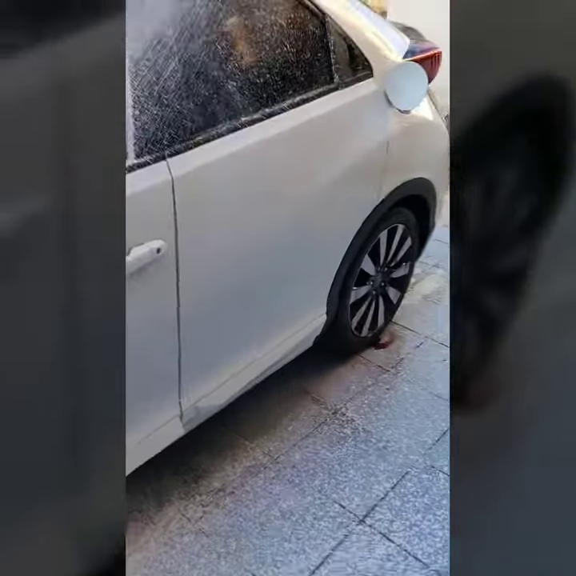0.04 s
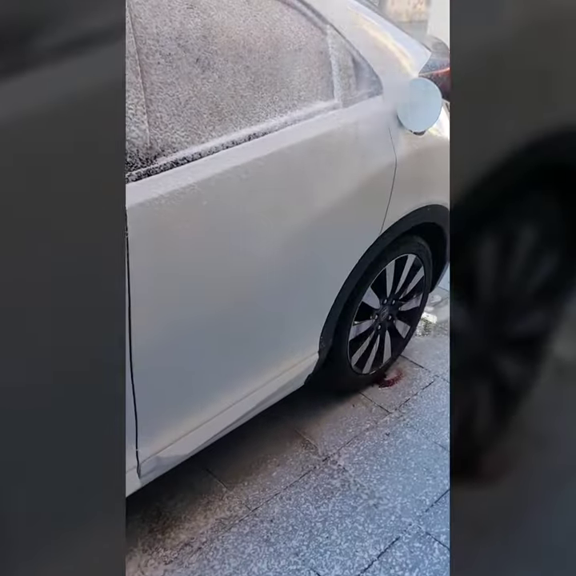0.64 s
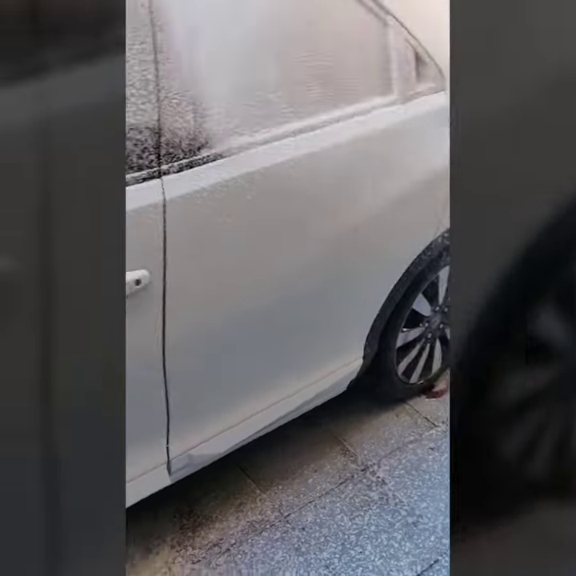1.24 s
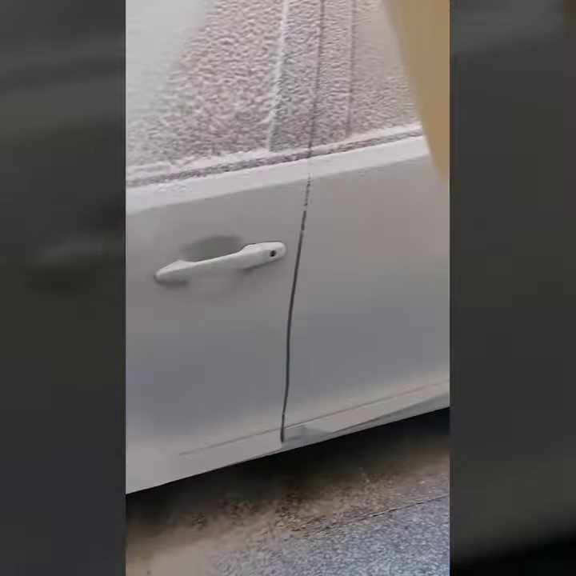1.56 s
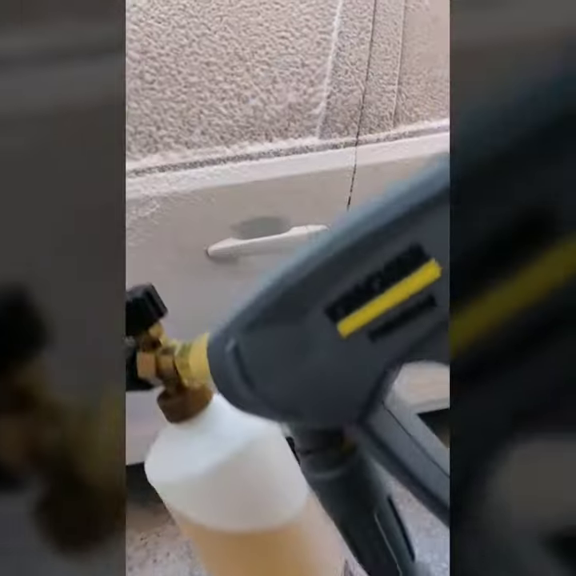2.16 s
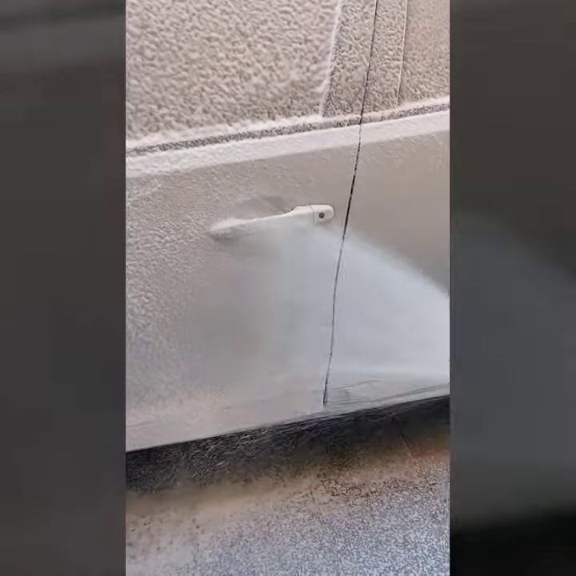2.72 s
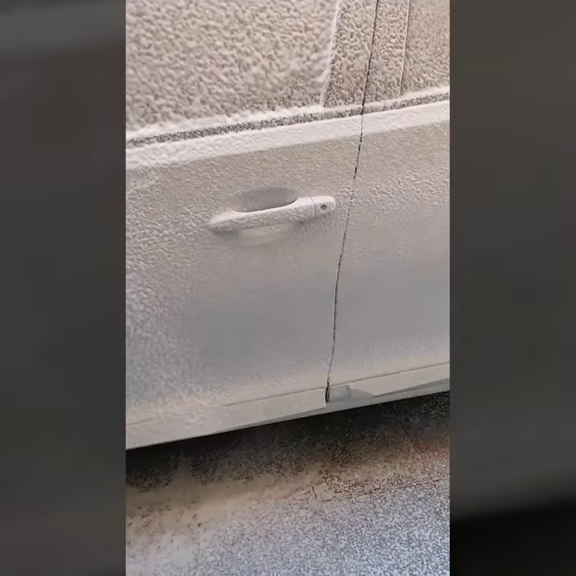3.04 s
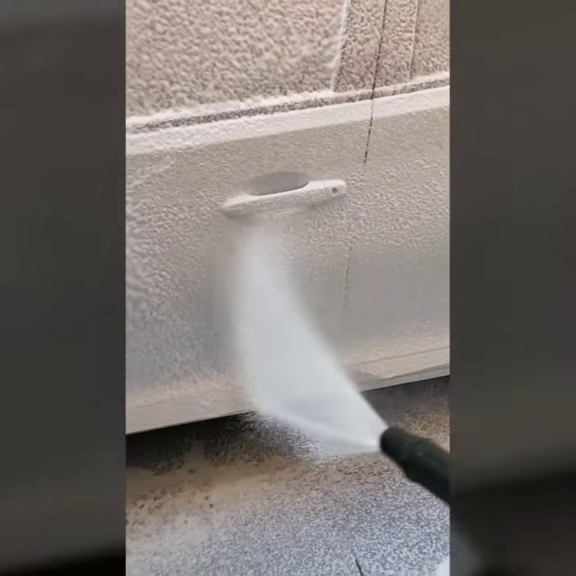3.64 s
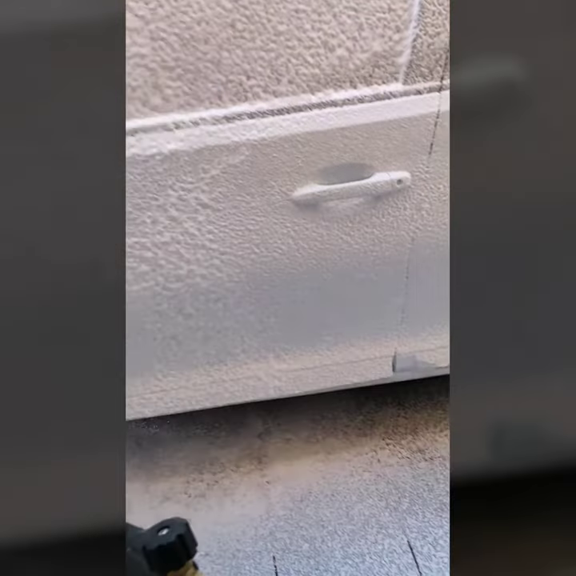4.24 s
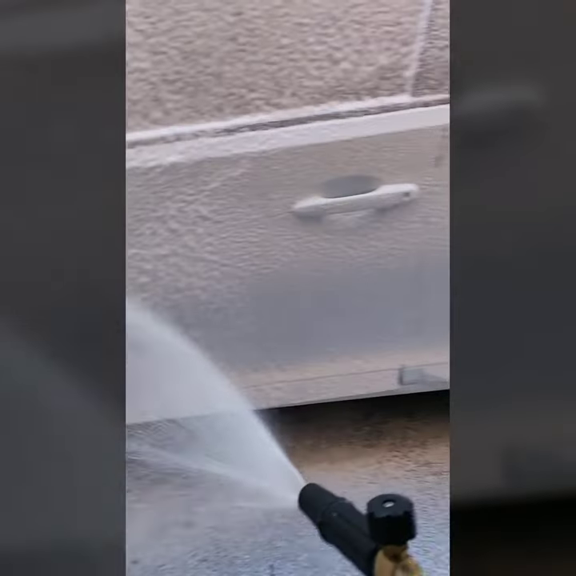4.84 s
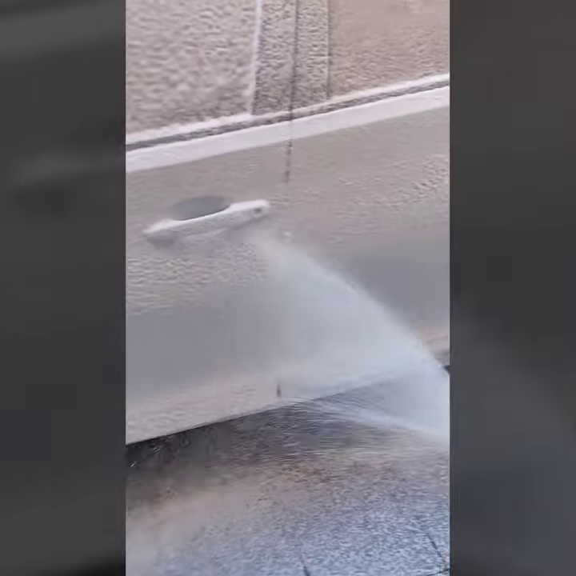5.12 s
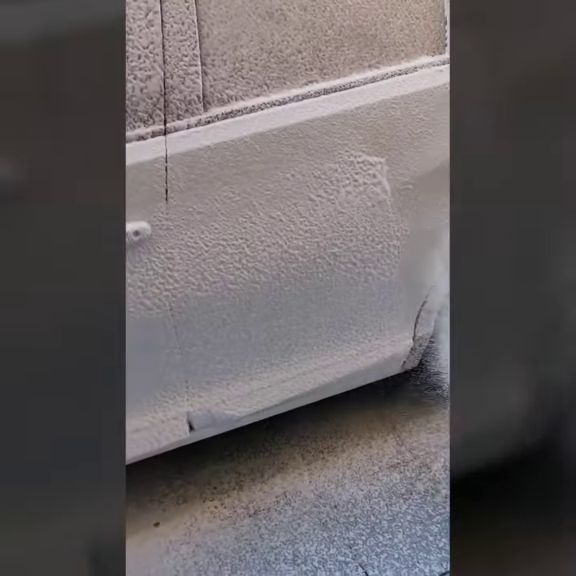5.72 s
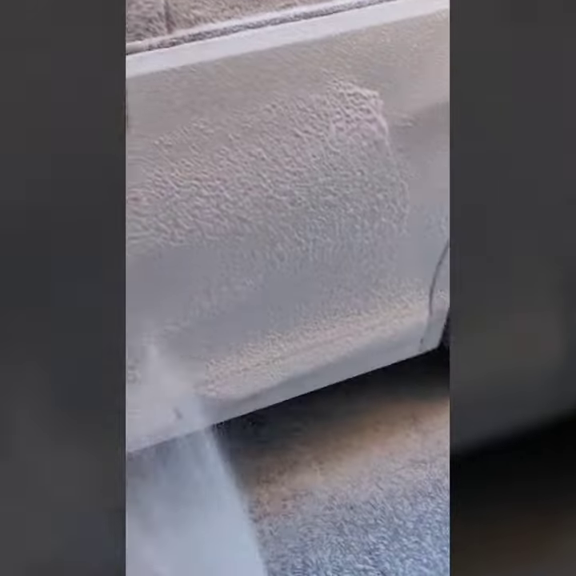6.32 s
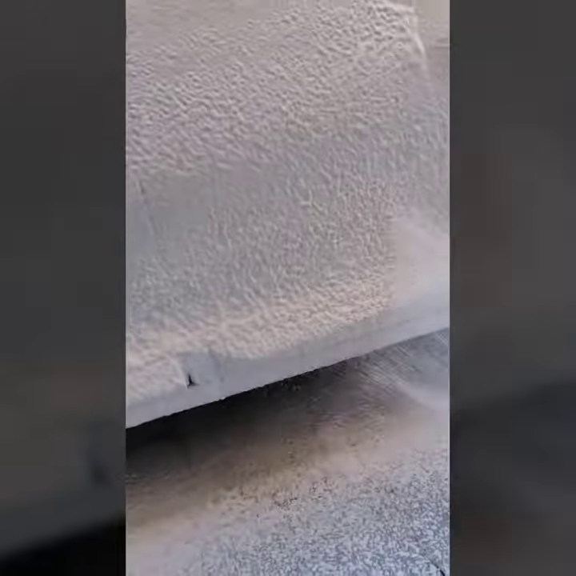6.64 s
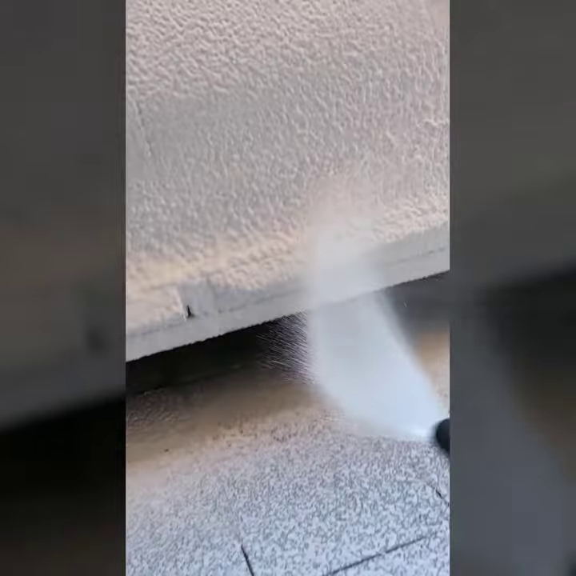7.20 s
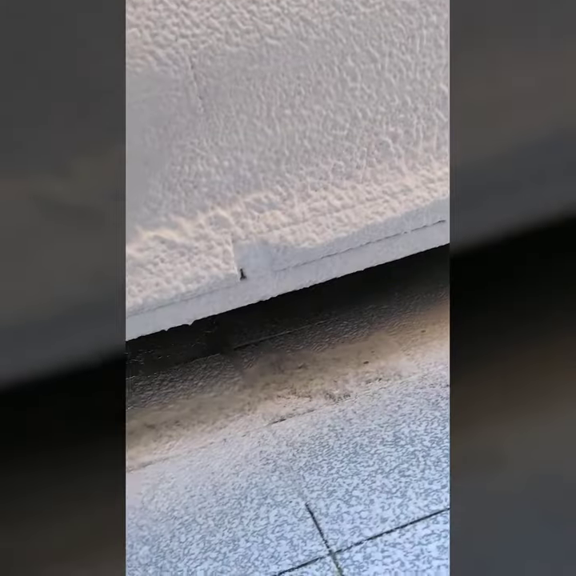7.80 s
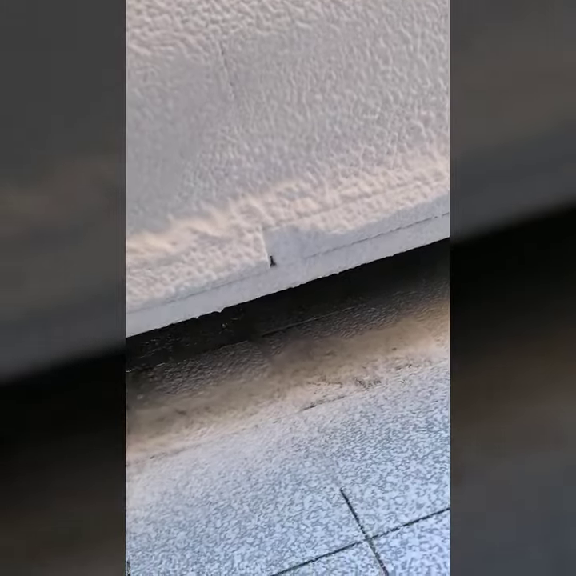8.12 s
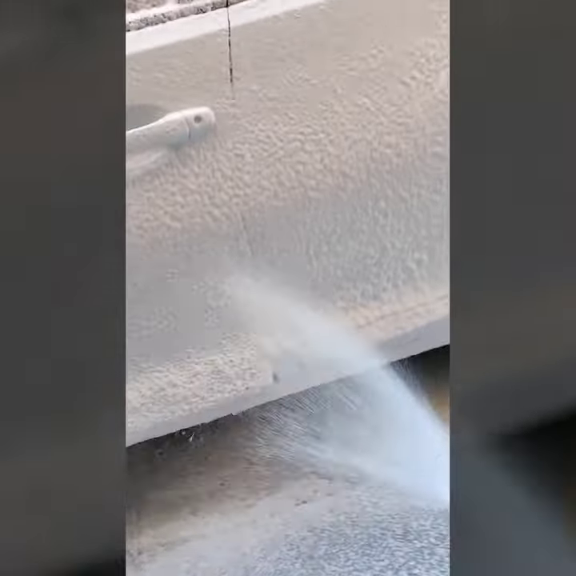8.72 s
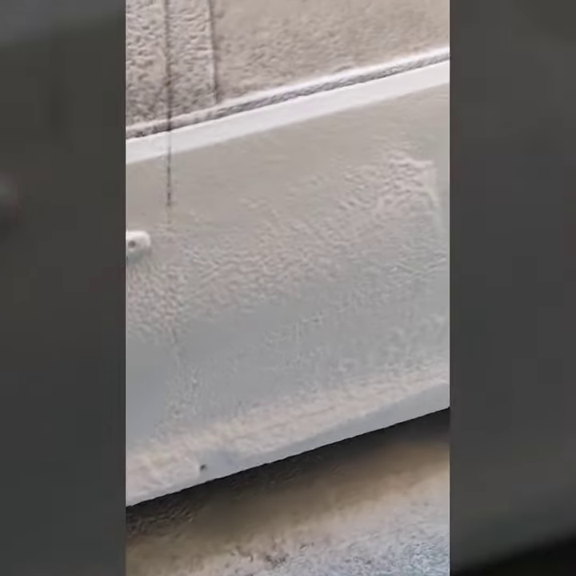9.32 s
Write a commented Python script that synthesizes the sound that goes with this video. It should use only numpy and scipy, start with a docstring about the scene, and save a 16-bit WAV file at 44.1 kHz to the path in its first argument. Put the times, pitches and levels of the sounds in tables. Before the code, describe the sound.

A pressure washer sprays foam onto a car outdoors, close to the microphone. A loud, bright hiss is there from the start and runs unbroken for about nine and a half seconds. It swells, dips and shifts gently from side to side as the nozzle sweeps, with a fine fizz of mist on top. Beneath it, foam drums softly and washes wetly over the hollow panels, and the pump hums faintly a little way off. From about 0.7 to 2.7 seconds the spray draws a thin ringing from the window and door, blended into the hiss. Around 8 seconds the nozzle comes closest to the door and a panel rings faintly, lower in pitch. Near 8.9 seconds a light puff of air brushes the microphone, followed by one more faint ring as the spraying continues.

```python
"""A pressure washer lays foam on a car outdoors, close to a hand-held microphone with two openings (ports).
From the start the sweeping nozzle hisses, with gliding echoes off paving and door; mist fizzes, foam
drums on the car, a three-piston pump hums a little way off and moving air rumbles faintly.
From about 0.7 to 2.7 s the spray makes window and door ring. Near 8 s the nozzle is closest to the door
and a panel rings again. Near 8.9 s a puff of air hits the microphone, and one last ring follows."""
import sys
import numpy as np
from scipy import signal
from scipy.fft import rfft, irfft, next_fast_len
from scipy.io import wavfile
from scipy.ndimage import uniform_filter1d, map_coordinates

SR = 44100
rng = np.random.default_rng(int(sys.argv[2]) if len(sys.argv) > 2 else 0)


def generate_wav(signal):
    """Clip the signal to [-1, 1] and save it as 16-bit WAV at the path in sys.argv[1]."""
    frames = np.transpose(np.atleast_2d(signal))
    scaled = np.clip(frames, -1, 1) * 32767
    pcm = np.round(scaled).astype(np.int16)
    wavfile.write(sys.argv[1], SR, pcm)


N = 421596


def amp(db):
    """Turn decibels into a number to multiply by."""
    return 10 ** (np.asarray(db) / 20)


def unit(x):
    """Scale a sound to an average strength (rms) of 1."""
    return x / np.sqrt(np.mean(x ** 2) + 1e-20)


def at_pitch(rows, hz):
    """Read between the rows of a (pitch_hz, value) table, on a log pitch scale."""
    pitches, values = np.transpose(rows)
    return np.interp(np.log(hz + 1), np.log(pitches + 1), values)


def curves(rows):
    """Turn each column after time_s into one value per sample."""
    times, *columns = np.transpose(rows)
    return [np.interp(np.arange(N) / SR, times, column) for column in columns]


def wobble(rate_hz):
    """A smooth curve through rate_hz random points a second."""
    points = rng.standard_normal(int(N * rate_hz / SR) + 4)
    return map_coordinates(points, [np.arange(N) * rate_hz / SR])


def filtered(x, response):
    """Multiply each pitch in x by response(hz)."""
    size = next_fast_len(N + SR // 4)
    return irfft(rfft(x, size) * response(np.fft.rfftfreq(size, 1 / SR)), size)[..., :N]


def delayed(x, ms):
    """Send x along a path whose travel time changes."""
    return map_coordinates(x, [np.arange(N) - ms * SR / 1000], mode="mirror")


def eddies(patchy_db, channels=2):
    """White noise whose strength wanders in patches of time and pitch."""
    spectrum = signal.stft(rng.standard_normal((channels, N)), nperseg=512)[2]
    patches = uniform_filter1d(rng.standard_normal(spectrum.shape), size=7, axis=1)
    patches = uniform_filter1d(patches, size=10, axis=2)
    return unit(signal.istft(spectrum * amp(patchy_db * unit(patches)), nperseg=512)[1][:, :N])


def rush(colour, alike, patchy_db):
    """Stereo noise shaped by a colour table; alike is the share common to both ports."""
    noise = eddies(patchy_db, channels=3)
    pair = np.sqrt(alike) * noise[0] + np.sqrt(1 - alike) * noise[1:]
    return unit(filtered(pair, lambda hz: amp(at_pitch(colour, hz))))


# The nozzle's direction, as how much later the left port hears it: time_s, lag_ms
LEFT_LAG = [(0, -.39), (.85, -.295), (1.4, -.33), (1.8, -.26), (2.25, 0), (2.47, .055), (3.1, -.025),
            (4.05, .07), (4.75, .16), (5.5, .055), (6.43, .25), (7.15, .005), (7.65, .165), (8.4, .23),
            (9.05, .04), (9.56, -.065)]
# How much later the two echoes arrive: time_s, paving_ms, door_ms
ECHO_DELAYS = [(0, 4.2, 2.8), (1.3, 3.5, 2.85), (2.1, 4.05, 2.8), (3.6, 4, 2.4), (5.6, 4.4, 2.6),
               (6.6, 3.65, 2.7), (7.2, 3.8, 2.15), (7.55, 3.5, 1.74), (7.9, 3.36, 1.61), (8.15, 3.38, 1.53),
               (8.6, 3.6, 1.75), (9.2, 4.3, 2.6), (9.56, 4.25, 2.8)]
def nozzle(paving_lag_ms=-0.052):
    """Nozzle noise arrives straight and bounces off paving and door; a nearer surface echoes louder."""
    source = eddies(patchy_db=1.22, channels=1)[0]
    (lag_ms,), (paving_ms, door_ms) = curves(LEFT_LAG), curves(ECHO_DELAYS)
    paving_gain = amp(-4.5 - 5 * (paving_ms - 3.42))  # 5 dB weaker per extra ms of travel
    door_gain = amp(-4.5 - 12 * (door_ms - 1.47))
    ports = []
    for side in (.5, -.5):  # left, right
        straight = delayed(source, side * lag_ms)
        off_paving = paving_gain * delayed(source, paving_ms + side * paving_lag_ms)
        off_door = door_gain * delayed(source, door_ms + 2 * side * lag_ms)
        ports.append(straight + off_paving + off_door)
    return np.array(ports) / np.sqrt(1 + paving_gain ** 2 + door_gain ** 2)


# The jet's colour (how strong each pitch is) at each port: pitch_hz, level_db
LEFT_COLOUR = [(400, -39), (1000, -26), (1600, -13.5), (2500, -5.5), (3100, 2.5), (4050, 2), (4700, -1),
               (5450, -1), (6050, -2), (6850, 3.5), (7600, -8), (8400, -11.5), (9200, -27), (12000, -47)]
RIGHT_COLOUR = [(400, -35), (1000, -29), (1600, -14), (2500, -4), (3100, 5.5), (4100, 6), (4750, -1.5),
                (5450, 3), (6050, -4.5), (6850, -2.5), (7600, 1.5), (8400, -7), (9500, -12.5), (12000, -25)]
# One narrow peak in the hiss: pitch_hz, width_hz, boost_db
HISS_PEAK = (2073, 316, 11.4)
# How far the wave at the left port runs ahead of the right: pitch_hz, lead_radians
LEFT_LEAD = [(1000, 0), (1600, -.45), (2500, -.3), (3500, .1), (4500, .25), (5700, 1), (6500, 0),
             (7300, -.85), (8000, 0)]
def port_colour(hz):
    """The two ports resonate differently, so each gives the hiss its own colour and timing."""
    centre_hz, width_hz, boost_db = HISS_PEAK
    peak_db = boost_db / (1 + (2 * (hz - centre_hz) / width_hz) ** 2)
    colour_db = np.array([at_pitch(LEFT_COLOUR, hz), at_pitch(RIGHT_COLOUR, hz)])
    phase = np.outer([.5, -.5], at_pitch(LEFT_LEAD, hz))
    return amp(colour_db + peak_db) * np.exp(1j * phase)


# How the noise is split before the fan's width is applied: pitch_hz, nozzle_power_share
NOZZLE_SHARE = [(1000, 0.39), (2100, 0.75), (3800, 0.61), (5000, 0.47), (6100, 0.48), (7100, 0.4),
                (8200, 0.18), (12000, 0.054)]
# How widely the fan of foam opens toward the microphone: time_s, fan_gain_db
FAN_SPREAD = [(0, -3), (.85, -3.5), (1.35, -2), (2.4, -4), (3.3, 0.5), (4.6, -4), (5.8, 2), (6.6, -0.5),
              (7.9, -3), (9.56, -1)]
def spray_noise():
    """The small nozzle and its wide fan of foam sound together, at about steady total power."""
    fan_gain = amp(curves(FAN_SPREAD)[0])
    point = filtered(nozzle(), lambda hz: np.sqrt(at_pitch(NOZZLE_SHARE, hz)))
    fan = filtered(eddies(patchy_db=2.03), lambda hz: np.sqrt(1 - at_pitch(NOZZLE_SHARE, hz)))
    blend = (point + fan_gain * fan) / np.sqrt((2 + fan_gain ** 2) / 3)
    return filtered(blend, port_colour)


# How the jet's strength rises and falls as the fan turns: time_s, hiss_db, sizzle_db
JET_STRENGTH = [(0.0, -16.5, -21), (0.42, -18.5, -21), (1.33, -13.8, -19.5), (1.63, -20.5, -23),
                (1.87, -15, -20.5), (2.73, -16.5, -19), (2.89, -21, -24.5), (3.41, -19.5, -20.5),
                (3.55, -16.0, -20.7), (4.66, -14.5, -22.5), (5.7, -18, -21.5), (6.04, -17.5, -22.5),
                (7.07, -17.5, -21), (7.19, -14.5, -19), (8.05, -16, -23.5), (8.58, -13, -20.2),
                (9.08, -15.5, -19), (9.56, -17.5, -22)]
def jet(roar_top_hz=2687, hiss_top_hz=6460, pan_db_per_ms=-6.5):
    """The spray makes a low roar, a hiss and a high sizzle, louder at the port facing the nozzle."""
    hiss_db, sizzle_db = curves(JET_STRENGTH)
    (spread_db,), (lag_ms,) = curves(FAN_SPREAD), curves(LEFT_LAG)
    spray = spray_noise()
    low = filtered(spray, lambda hz: 1 / (1 + (hz / roar_top_hz) ** 16))
    low_and_mid = filtered(spray, lambda hz: 1 / (1 + (hz / hiss_top_hz) ** 16))
    # A stronger hiss or a wider fan roars more.
    roar_db = -21 + .85 * (hiss_db - hiss_db.mean()) + .75 * (spread_db - spread_db.mean())
    roar = amp(roar_db + 0.41 * wobble(9) + 0.52 * wobble(26)) * unit(low)
    hiss = amp(hiss_db - 3.0 + 0.67 * wobble(30)) * unit(low_and_mid - low)
    beam_db = np.outer([-.5, .5], .6 * (sizzle_db - sizzle_db.mean()))  # sizzle aims at the right port
    sizzle = amp(sizzle_db + beam_db - 1.27 + 0.48 * wobble(30)) * unit(spray - low_and_mid)
    lean_db = np.outer([.5, -.5], pan_db_per_ms * lag_ms)
    return (roar + hiss + sizzle) * amp(lean_db)


# The beam of fine mist sweeping past the microphone: time_s, level_db
MIST_BEAM = [(0.0, -25), (1.2, -33.5), (1.37, -26), (1.91, -26.5), (2.17, -31.5), (3.03, -25.0),
             (3.39, -29.9), (3.73, -24.5), (4.5, -32.5), (5.02, -29), (5.18, -27), (5.98, -32.0),
             (6.31, -26.5), (7.17, -27.5), (7.69, -25.6), (8.15, -36), (8.62, -27.5), (9.56, -37.5)]
# The colour of its fizz: pitch_hz, level_db
FIZZ_COLOUR = [(6000, -40), (8500, -0.5), (10000, -0.5), (12000, 0), (14000, 0.5), (15700, -3.5)]
def mist(tilt_db_per_db=0.8, edge_hz=12500):
    """Countless tiny droplets fizz at each port; away from the beam the highest pitches fade first."""
    (beam_db,), (lag_ms,) = curves(MIST_BEAM), curves(LEFT_LAG)
    left_minus_right_db = -6 - 9 * lag_ms + 0.56 * (beam_db - beam_db.mean())
    level_db = beam_db + np.outer([.5, -.5], left_minus_right_db)
    fizz = rush(FIZZ_COLOUR, alike=.03, patchy_db=0.7)
    low = filtered(fizz, lambda hz: 1 / (1 + (hz / edge_hz) ** 10))
    tilt_db = tilt_db_per_db * (level_db - level_db.mean(axis=1, keepdims=True))
    tilted = amp(-tilt_db / 2) * low + amp(tilt_db / 2) * (fizz - low)
    flutter_db = .7 * wobble(30) + .5 * wobble(9)
    return amp(level_db + flutter_db + 1.15) * tilted


# How hard the foam lands on the car: time_s, drum_db, wash_db
FOAM_STRENGTH = [(0.0, -36.5, -34), (1.3, -31.5, -30), (1.55, -39.5, -34), (2.05, -31.5, -30.4),
                 (2.99, -35.5, -35.0), (3.63, -33, -33), (6.15, -33.5, -33.0), (6.41, -35.5, -33.0),
                 (7.31, -32.5, -29.5), (7.63, -37.5, -32.5), (8.3, -32.5, -29.5), (9.56, -32.5, -29.5)]
# The colours of the drumming and of the wet wash: pitch_hz, level_db
DRUM_COLOUR = [(30, -47), (70, -30), (120, -6.5), (170, -9), (200, -4), (300, -2), (480, 0.5), (620, -5.5),
               (800, -7.5), (1300, -21), (3000, -60)]
WASH_COLOUR = [(150, -45), (550, -3), (800, -0.5), (1100, -3), (1500, -3.5), (2000, -26), (4000, -24),
               (8000, -60)]
def foam_landing():
    """Foam drums on the hollow panels and washes over the wet paint where the nozzle points."""
    (drum_db, wash_db), (lag_ms,) = curves(FOAM_STRENGTH), curves(LEFT_LAG)
    drum = amp(drum_db - 1.28) * rush(DRUM_COLOUR, alike=0.52, patchy_db=2.5)
    left, right = amp(wash_db - 0.3) * rush(WASH_COLOUR, alike=0.46, patchy_db=2.0)
    return drum + np.array([delayed(left, lag_ms / 2), delayed(right, -lag_ms / 2)])


# The pistons' low tone, three strokes a turn: time_s, level_db
PISTON_LEVEL = [(0, -55.5), (2.1, -46), (3, -49.5), (4.9, -50), (5.8, -43.5), (6.6, -59.5), (8.2, -46.5),
                (8.8, -52.5), (9.56, -40)]
# The pump's higher tones: multiple_of_shaft_speed, level_db
OVERTONES = [(7, -47.5), (9, -46), (10, -48.5), (11, -44.5), (12, -52.5), (13, -49), (15, -55)]
# What is added to all those higher tones as the microphone moves: time_s, gain_db
OVERTONE_GAIN = [(0, 1), (.4, -2), (1.15, 8), (1.8, -11), (3.1, -3), (4.9, -1.5), (5.8, 4), (6.6, 1),
                 (8.3, 5), (9.56, 0.5)]
def pump(shaft_hz=46.67, swell_db=2, leave_s=1.8, fade_s=.25):
    """Three pistons hum; each tone swells and fades as the microphone passes its loud and quiet spots."""
    t = np.arange(N) / SR
    turns = np.cumsum(shaft_hz * (1 + 0.00099 * wobble(5))) / SR
    tone = lambda multiple: np.sqrt(2) * np.sin(2 * np.pi * (multiple * turns + rng.random()))
    (piston_db,), (gain_db,) = curves(PISTON_LEVEL), curves(OVERTONE_GAIN)
    at_first_spot = (1 - np.tanh((t - leave_s) / fade_s / 2)) / 2  # 1 falls to 0 as the microphone leaves
    strokes = amp(piston_db + 0.55 * wobble(5)) * tone(3)
    octave = amp(-45 + 11.5 * at_first_spot + .8 * wobble(3.08)) * tone(6)
    overtones = sum(amp(db + gain_db + swell_db * wobble(1.603)) * tone(k) for k, db in OVERTONES)
    return strokes + octave + overtones


# The colour of air rumbling over the ports: pitch_hz, level_db
RUMBLE_COLOUR = [(10, -9), (30, -2), (60, -4), (100, -3.5), (200, -8), (600, -50)]
def draught(puff_middle_s=8.86, puff_length_s=0.21, puff_boost_db=15):
    """Air dragged along by the spray buffets the ports lightly, once in a short puff."""
    puff = np.exp(-(2 * (np.arange(N) / SR - puff_middle_s) / puff_length_s) ** 4)
    level_db = -51.5 + puff_boost_db * puff + 2.1 * wobble(15)
    port_gain = amp([[1.5], [-2]])  # left, right
    return amp(level_db) * port_gain * rush(RUMBLE_COLOUR, alike=0.16, patchy_db=2.5)


# Panels ringing under the full jet: start_s, end_s, pitch_hz, width_hz, level_db
PANEL_RINGS = [(0.94, 1.7, 3930, 300, -37), (.72, 1.13, 516, 100, -37.5), (0.716, 1.34, 6800, 600, -23.5),
               (1.8, 2.66, 4000, 290, -33), (8.02, 8.54, 370, 130, -44), (9.15, 9.6, 990, 200, -39)]
def ringing_panels(fade_s=0.063):
    """Window and door ring with a narrow band of noise for as long as the spray stays on them."""
    t, sound = np.arange(N) / SR, np.zeros((2, N))
    for start_s, end_s, pitch_hz, width_hz, level_db in PANEL_RINGS:
        resonance = lambda hz: 1 / (1 + (2 * (hz - pitch_hz) / width_hz) ** 2)
        sprayed = np.clip(np.minimum(t - start_s, end_s - t) / fade_s + .5, 0, 1)
        sound += amp(level_db) * sprayed * unit(filtered(rng.standard_normal(N), resonance))
    return sound


def scene():
    """Add up all the sounds at the two ports."""
    return jet() + mist() + foam_landing() + pump() + draught() + ringing_panels()


def record(dry):
    """Round off the rare highest peaks and cut away the very highest pitches."""
    ceiling, top_hz = .95, 15800
    rounded = dry / (1 + np.abs(dry / ceiling) ** 8) ** (1 / 8)
    return filtered(rounded, lambda hz: hz < top_hz)


dry = scene()
out = record(dry)
generate_wav(out)
```